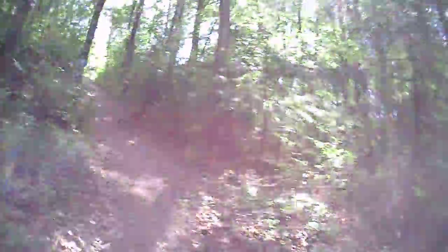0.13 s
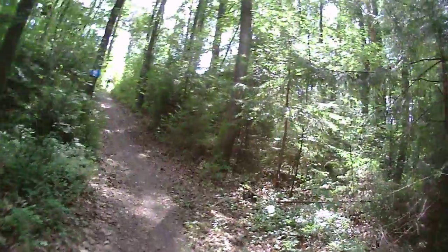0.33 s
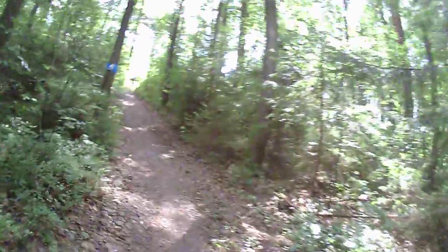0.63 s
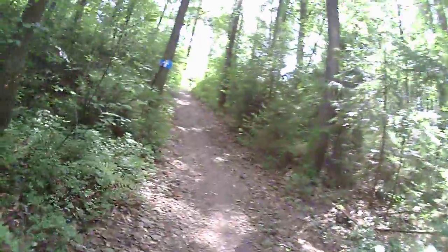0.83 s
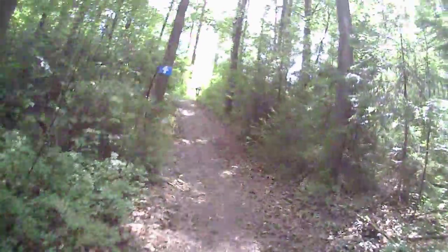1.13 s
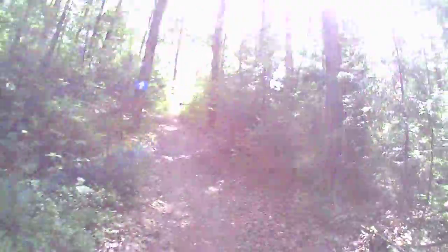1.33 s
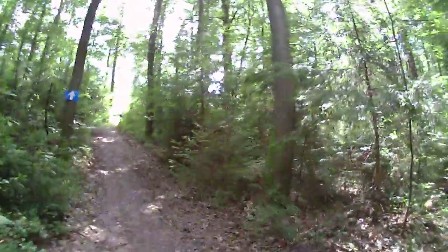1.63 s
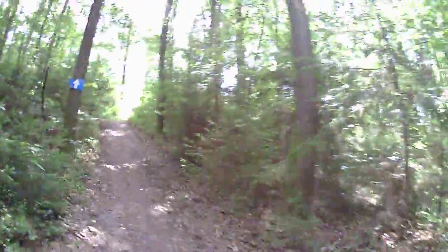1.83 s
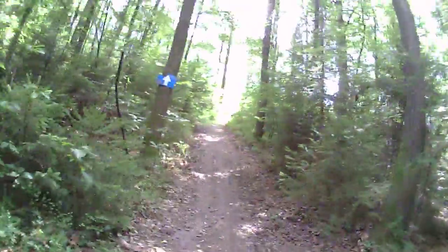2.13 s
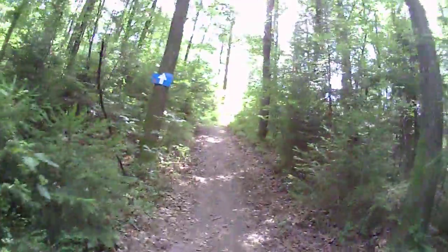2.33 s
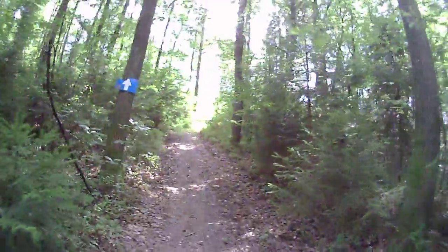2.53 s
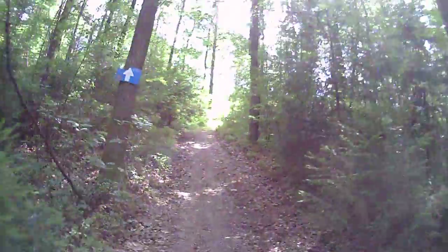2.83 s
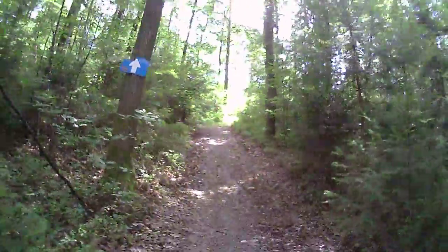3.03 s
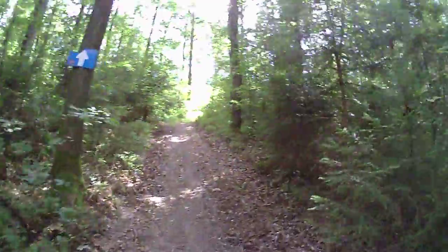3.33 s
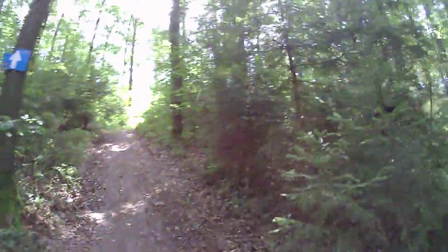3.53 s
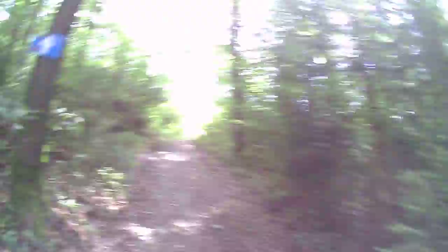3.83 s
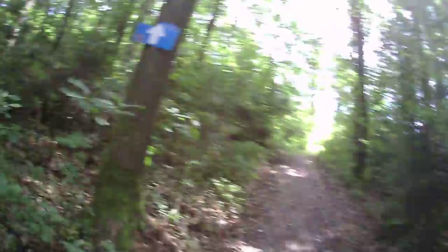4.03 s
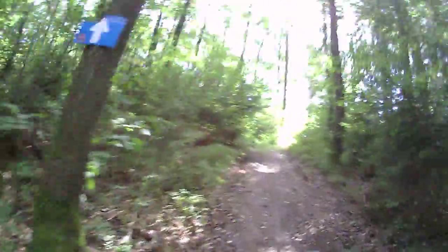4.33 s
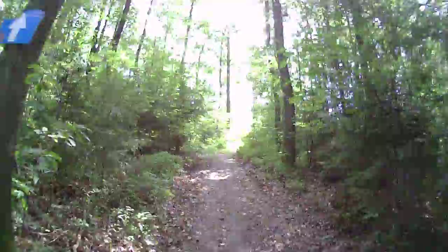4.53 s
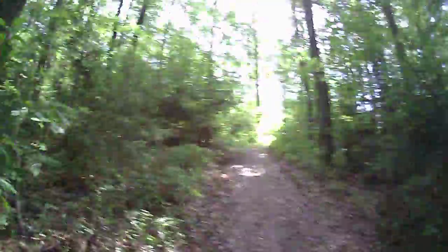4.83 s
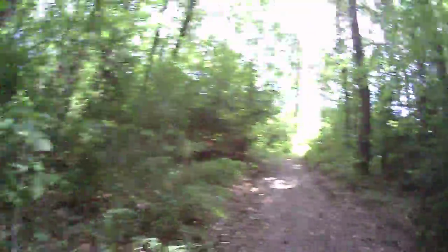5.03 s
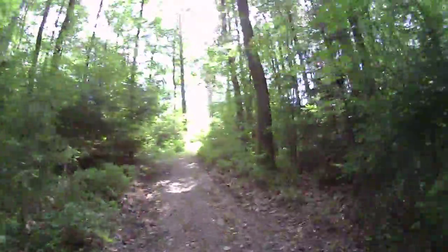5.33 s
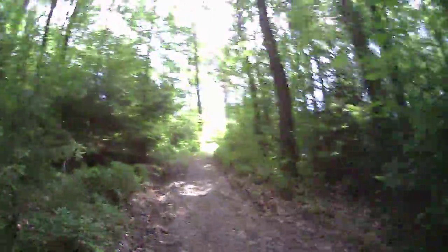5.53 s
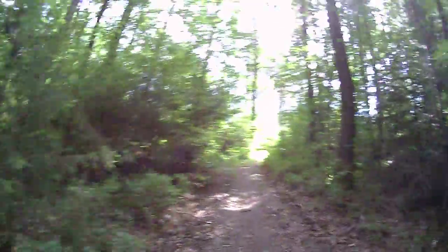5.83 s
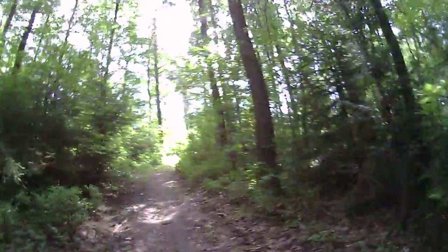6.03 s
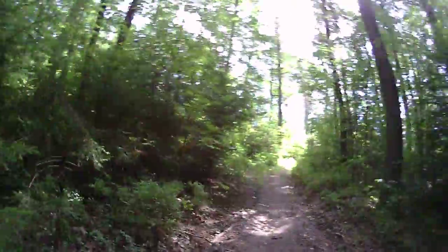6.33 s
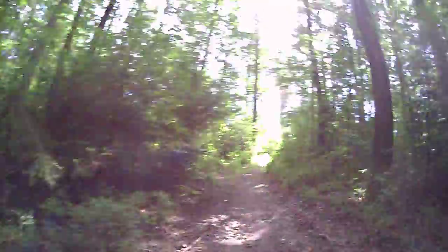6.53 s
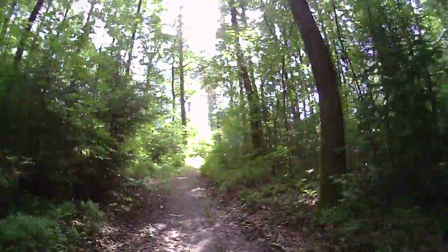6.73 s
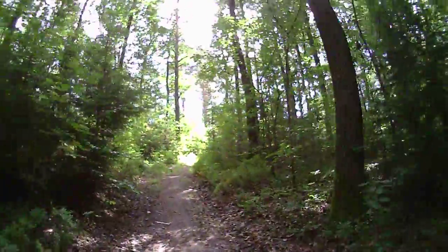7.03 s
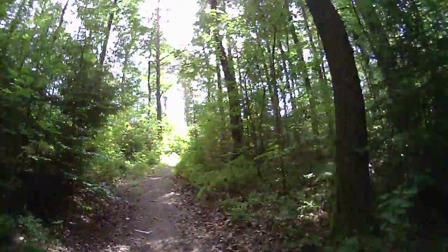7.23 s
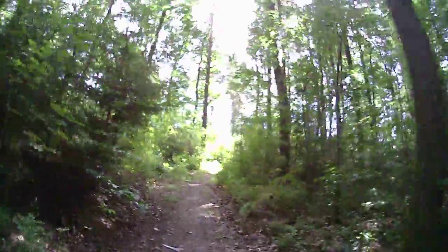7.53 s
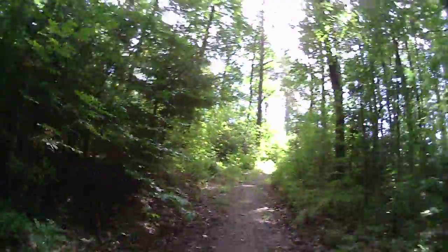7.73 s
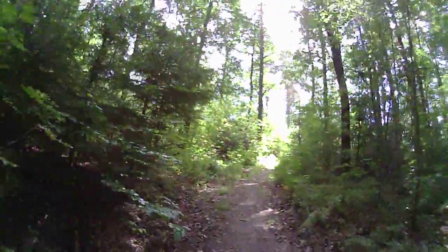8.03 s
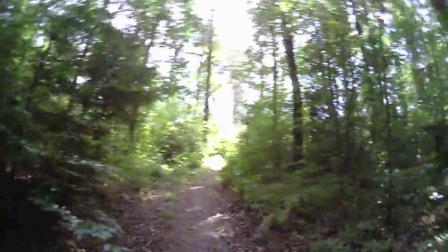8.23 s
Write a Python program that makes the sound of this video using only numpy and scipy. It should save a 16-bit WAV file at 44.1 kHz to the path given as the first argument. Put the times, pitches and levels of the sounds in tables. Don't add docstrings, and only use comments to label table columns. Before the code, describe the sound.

Bicycle tyres grind over a rough woodland path, shaking a loose camera mount. Hollow plastic clacks come in uneven flurries, a cable scrapes and slaps the frame, and the hardest jolts crackle with distortion before the ride settles into rumbling and scattered knocks. Everything is felt through the mount by a cheap, close microphone with dull treble and faint hiss.

```python
import sys
import numpy as np
from scipy import signal
from scipy.fft import rfft, irfft
from scipy.io import wavfile
from scipy.ndimage import uniform_filter1d

SR = 44100
rng = np.random.default_rng(int(sys.argv[2]) if len(sys.argv) > 2 else 0)


def natural_amplitude(level_db):
    exponent = np.asarray(level_db, float) / 20
    return 10 ** exponent


def wrap_up_sound(samples):
    columns = np.atleast_2d(samples).T
    tamed = np.clip(columns, -1, 1)
    steps = np.round(tamed * 32767).astype(np.int16)
    wavfile.write(sys.argv[1], SR, steps)


N = 369999
RING_N = 2500

# (first blow [s], last blow [s], first level [dB], last level [dB])
BUMPS = [(0.016, 0.024, -15.5, -20.5), (0.1809, 0.1966, -10.5, -17), (0.2577, 0.2898, -19.5, -15.5),
         (0.506, 0.518, -11, -33), (0.563, 0.5989, -11, -9.5), (0.7082, 0.7444, -17, -20.5),
         (0.975, 0.9887, -15, -11.5), (1.0317, 1.061, -11, -17), (1.1692, 1.18, -16.5, -13),
         (1.215, 1.2739, -14.5, -12), (1.4074, 1.421, -11, -12), (1.5093, 1.526, -9, -17),
         (1.6086, 1.624, -1.5, -1), (1.793, 1.822, -13, -13.5), (1.9298, 1.9577, -14, -8.5),
         (1.969, 2.0296, -13, -12), (2.2548, 2.267, -11.5, -15.5), (2.5854, 2.6, -12, -22),
         (3.4405, 3.496, -14, -32), (4.379, 4.391, -5.5, -2.5), (4.4575, 4.474, -10, -13.5),
         (4.53, 4.5605, -15, -14), (4.8744, 4.896, -20, -20.5), (5.231, 5.244, -18, -23),
         (5.5356, 5.551, -11.5, -8.5), (5.6, 5.615, -8, -20), (5.7435, 5.7567, -16.5, -14.5),
         (7.4617, 7.475, -19, -20), (5.2732, 5.301, -16.5, -40.5), (7.8334, 7.85, -23, -16)]
# (time [s], housing [dB], mount [dB], sharpness [dB])
CRACKS = [(.3734, -14.5, -33.5, -3.5), (2.6821, -23, -25, 8), (2.7316, -24, -27, 7), (2.7868, -8, -34, 17),
          (3.0807, -9.5, -18, -7), (3.1067, -19, -18.5, 4.5), (3.125, -10, -18.5, 3.5),
          (3.2241, -17.5, -17.5, 2.5), (3.2638, -28, -41, 8), (3.3167, -1, -31, 6.5),
          (3.525, -14.5, -11, 3.5), (3.5517, 7, -14, 3.5), (3.5952, 6, 2, 6), (3.6141, 3.5, -5, 2.5),
          (3.637, -7, -4.5, 0.5), (3.7498, 4, -15, -3), (3.7643, -30.5, -21, 11), (3.7899, -5.5, -15, -10),
          (3.9562, 4.5, -9, -4.5), (4.1271, -9, -22, 0), (4.151, -11, -22, -8), (4.326, -12, 0, 6),
          (4.3435, -17, -22, 5), (4.4349, -7, -4.5, 0), (4.6645, -3, -24, -12), (5.9795, -8, -6.5, 0),
          (1.652, -12, -10.5, 2.5), (2.1657, -25.5, -27, 4), (2.3375, -30.5, -47, 5),
          (5.0589, -30, -24, 7.5)]
# (time [s], housing [dB], mount [dB], sharpness [dB])
LANDINGS = [(.1663, -6, -1.5, 4), (.4911, -8, -8.5, -1), (.958, -19, -15, -2), (1.4965, -12, -9, 3.5),
            (1.573, -24, -19, 6), (1.5991, -7.5, -4, 10.5), (1.7768, -9.5, -2, 3.5),
            (1.845, -30.5, -18.5, 3), (2.5719, -10, -8.5, 0), (4.3612, -4.5, -3, 2.5),
            (4.5199, -10.5, -1.5, 4), (4.8624, -13.5, -12, -7), (4.995, -32, -18, 8.5),
            (5.2604, -12, -10, 1.5), (5.5228, -7, -6, 3.5), (5.5856, -14.5, -7.5, 5),
            (7.581, -25, -15.5, 6.5), (7.5934, -7.5, -6.8, 3), (7.619, -21, -16.5, 3.5),
            (7.8158, -18.5, -11, 4)]
# (time [s], housing [dB], mount [dB])
KNOCKS = [(0.4657, -18, -16.5), (0.914, -24, -27), (1.3118, -19.5, -20.5), (1.3669, -21.5, -27),
          (1.5882, -20, -8.5), (1.633, -11.5, -15), (1.6805, -13.5, -9), (2.5429, -20.5, -15.5),
          (2.8584, -18, -32), (2.9366, -23, -27), (3.8775, -19, -14), (3.9099, -21, -15),
          (3.5815, -17, -11), (4.9596, -14.5, -8.5), (4.9691, -23, -25), (5.0133, -27, -15.5),
          (5.4785, -21, -8.5), (6.008, -25, -15), (6.0708, -22, -13), (6.093, -18, -11),
          (6.1997, -17.5, -12.5), (6.2427, -16, -11.5), (6.459, -24, -20), (6.8229, -18, -17),
          (7.0258, -22.5, -22), (7.6467, -20, -10.5), (7.6859, -22.5, -14.5), (8.2722, -18.5, -22),
          (8.2987, -14.5, -13), (8.3757, -21, -42.5)]
# (time [s], level [dB])
RATTLES = [(0.479, -30.5), (0.879, -27), (2.126, -42), (2.2215, -22.5), (2.5177, -23), (2.6967, -24),
           (2.8697, -28), (3.243, -20), (4.2196, -30), (4.672, -33), (4.848, -22), (4.918, -23),
           (5.028, -24), (5.3349, -28.5), (5.3968, -32), (5.719, -31.5), (5.85, -23), (6.3583, -30),
           (6.437, -24), (6.484, -27), (6.7204, -30), (6.749, -29.5), (7.091, -23), (7.2196, -23.5),
           (7.3951, -27), (7.6064, -21), (7.9123, -21.5), (7.9357, -27), (8.044, -28.5), (8.3403, -21.5)]
# (time [s], housing [dB], mount [dB], sharpness
# [dB])
MORE_BLOWS = [(6.653, -46, -20, -6), (4.583, -27, -18, 3), (7.555, -28, -14, 9.5), (8.108, -28, -21, 2),
              (8.2, -36, -32, 9), (5.161, -28, -20, -3), (2.41, -33, -25.5, -5), (4.533, -27, -22, 10),
              (7.359, -30, -16, 3), (5.935, -31, -17.5, -6), (6.8, -32, -32, 5), (4.9, -23, -18, 0),
              (5, -30, -22, 6), (0.17, -32, -21, 0), (4.694, -27, -19.5, 0), (6.826, -31.5, -21, 11),
              (5.663, -28, -19, 2), (7.368, -34, -29, 11.5)]
# (time [s], housing [dB], mount [dB], sharpness [dB])
JOLTS = [(3.4465, -7, -16, -9), (3.479, -20, -10, 0), (3.5375, -24, -30, 5), (3.4955, -16, -11, 3),
         (5.993, -24, -20, 6), (6.022, -26, -18, -2), (6.03, -30, -30, 7), (5.863, -28, -16, -3),
         (5.878, -26, -19, 5), (1.018, -26, -22, 0), (1.2605, -15, -12, 2), (1.303, -24, -21, 0),
         (1.324, -24, -24, 2), (4.973, -26, -20, 7), (4.631, -26, -30, 2), (.276, -22, -20, 6),
         (.582, -20, -17, 4), (3.062, -24, -30, 5), (3.246, -26, -24, 4), (5.757, -24, -30, 5),
         (3.133, -15, -30, 0), (6.128, -28, -17, -3), (6.815, -27, -17, 2), (3.511, -24, -16, 0),
         (1.639, -20, -13, 3), (2.557, -28, -18, 6), (8.324, -30, -22, 2), (7.507, -28, -20, 2),
         (3.951, -16, -20, 0), (2.72, -28, -22, 4), (2.83, -26, -28, 2)]
# (frequency [Hz], level [dB], time to fade by 60 dB [s])
MOUNT_RING = [(245.4, 6.5, 0.025), (174, -12.5, 0.033), (322.4, 1, 0.028), (368.7, -11.5, 0.041)]
HOUSING_RING = [(668.5, -8, 0.048), (762, -1, 0.027), (921, 0.5, 0.015)]
SHELL_RING = [(1424.5, 7.5, 0.027), (1164, -8, 0.028), (1629, -5, 0.041)]
TICK_RING = [(2096, -5, 0.02), (2750, 3.5, 0.018), (3196, -0.5, 0.013), (3474, 1, 0.012)]
CLACK_RING = [(3040, -1, 0.011), (3150, 2, .017), (3300, 2.5, 0.03), (3600, 1, 0.012)]
CHIRR_RING = [(1445, 4.5, 0.03), (1300, -7, 0.04), (1660, -15.5, .04), (2130, -15, 0.04)]
FRAME_RING = [(765.2, -0.5, 0.17), (710, -3.5, 0.71), (1295, -4, .35), (456.9, -3, .45), (610, -3, 0.5),
              (672, -9.5, .35), (352, -9.5, 0.27), (1365, -7, .3), (523.5, -6.5, 0.24), (546, -6, 0.34),
              (425, -8.5, 0.6)]
# (time of the top [s], peak [dB], rise [s per 6 dB], fall [s per 6 dB], frame ring [dB])
SWINGS = [(1.511, -18, .012, .011, -45), (2.872, -18, .009, .011, -45), (2.95, -18, .008, .012, -40),
          (3.01, -19, .03, .025, -40), (3.096, -3.5, .011, .012, -38), (3.402, -18, .01, .01, -45),
          (3.452, -8, .008, .009, -30), (3.603, 4, .004, .013, -14), (3.76, 0, .004, .0115, -25),
          (3.967, -1, .005, .012, -24), (4.172, -15, .045, .007, -38), (4.66, -22, .025, .012, -50),
          (4.331, -9, .004, .009, -40), (4.384, -12, .006, .012, -34), (5.278, -21, .01, .008, -45),
          (.915, -22, .03, .008, -50), (1.768, -16, .01, .01, -50), (5.37, -24, .03, .02, -50),
          (6.74, -23, .015, .015, -50), (7.54, -20, .025, .01, -50), (7.92, -23, .008, .02, -50),
          (8.02, -26, .03, .02, -50), (3.303, -20, .012, .012, -50), (6.11, -20, .012, .018, -50),
          (6.793, -22, .01, .01, -50), (1.62, -11, .015, .018, -45), (2.04, -22, .02, .02, -50),
          (4.01, -23, .02, .025, -50)]
# (time [s], upper ring [dB], lower ring [dB], body [dB], ring length [factor])
PINGS = [(2.6805, -29, -45, -50, 0.58), (2.7877, -17.5, -12.5, -33, 0.71), (3.0628, -43, -48.5, -30, 1.3),
         (3.0744, -38, -41, -26, 1.1), (3.1069, -32, -39.5, -22, 0.72), (3.1251, -19, -42, -14.5, 0.63),
         (3.224, -37, -37, -34, 0.8), (3.263, -34.5, -45, -39, 0.82), (3.317, -8, -12.5, -25, 0.58),
         (3.487, -36, -48, -40, .8), (3.538, -35, -48, -40, .7), (3.551, -12.5, -15, -5, .8),
         (3.751, -40, -22, -30, .6), (3.77, -50, -38, -50, 1.3), (3.789, -48, -31, -40, .8),
         (4.1265, -35, -39, -28, 2.7), (4.151, -40, -37, -26, 1.6), (4.8273, -45, -48, -37, 0.82),
         (5.0588, -41.5, -46, -36, 0.9), (5.6477, -42.5, -54, -40, 1.7), (6.1715, -37, -56, -39, .7),
         (6.249, -35, -46, -37, .8), (7.087, -41, -56, -38, .9), (7.477, -39, -56, -44, 0.69),
         (7.412, -37.5, -56.5, -38, 0.87), (8.3763, -38.5, -57, -40, 1.1)]
PING_HZ = [2775, 2140, 1190, 3570]
PING_T60 = np.array([.035, .03, .02, .26])
# (time [s], level [dB])
CHIRRS = [(0.414, -31.5), (0.4423, -35), (0.6893, -30), (0.7906, -27.5), (0.8345, -34), (1.114, -28.5),
          (1.1506, -35), (1.3414, -29), (1.7235, -29.5), (1.8923, -26.5), (1.914, -24.5), (2.1255, -26.5),
          (2.2134, -29), (2.3276, -27), (2.372, -39), (2.385, -27.5), (2.4334, -40.5), (2.9489, -28.5),
          (2.9893, -28), (3.0135, -28), (4.0844, -25), (4.2039, -23.5), (4.2368, -32), (4.748, -28.5),
          (4.7745, -32), (5.0345, -23.5), (5.0628, -23), (5.0894, -28), (5.3004, -24), (5.6311, -25),
          (5.6501, -24), (5.7199, -22), (5.8194, -25.5), (5.914, -38.5), (6.3335, -25), (6.3795, -26.5),
          (6.4849, -24.5), (6.5211, -33), (6.6588, -32), (6.7809, -28), (6.8883, -31), (6.9861, -36),
          (7.1227, -27.5), (7.158, -26), (7.195, -25), (7.4484, -34), (7.4814, -38), (7.767, -29),
          (7.894, -27), (7.862, -29), (8.0162, -28), (8.095, -31.5), (8.2338, -30.5), (6.358, -24),
          (6.459, -22), (3.93, -22), (4.1275, -10), (1.957, -19), (6.718, -27), (6.592, -29), (1.681, -19)]
# (start [s], end [s], level [dB])
SCRAPES = [
    (2.935, 3.12, -25.5),
    (3.44, 3.55, -39),
    (4.8, 4.87, -37),
    (3.55, 3.6, -26),
    (1.88, 2.04, -29.5),
    (1.2, 1.29, -29),
    (4.32, 4.42, -28),
    (.49, .62, -34),
]
# (frequency [Hz], width [Hz], level [dB])
SCRAPE = [(454, 30, 2.5), (636, 220, 2.5), (960, 1100, 0.5), (1416, 160, -2.5), (1737, 60, -13),
          (2070, 60, -10.5), (310, 210, 4)]
MOUNT = [(248.9, 52, 1), (172, 36, -13), (414.4, 130, -10.5)]
HOUSING = [(638, 140, -4), (721, 140, -6), (883, 350, -7.5)]
SHELL = [(1435, 130, -1.5), (1280, 250, -8), (1700, 200, -13), (2135, 120, -16), (2790, 120, -15.5),
         (2550, 300, -27), (3350, 600, -23)]
# (time [s], level [dB])
RIDE = [(0.0, 1), (0.9, -1), (1.45, 0.5), (1.62, 4.5), (1.75, 0), (2.17, -1), (2.9, 0.5), (3.43, 2),
        (3.65, 5), (3.9, 5), (4.21, 1), (4.651, -0.5), (5.37, 2), (5.5, 3.5), (7.2, 1), (7.55, 4),
        (7.74, -0.5), (8.39, 1)]
# (level [dB], share of roughness [factor], after-shake re the blows [dB], after-shake 60 dB fade [s])
MOUNT_SHAKE = (-34, 1.34, -25, 0.1)
HOUSING_SHAKE = (-42.5, 2.5, -31.5, 0.16)
SHELL_SHAKE = (-45, 1, -44, 0.25)
FRAME_SHAKE = (-39, 0.72, -23.5, 0.07)
# (frequency [Hz], level [dB per Hz])
RUMBLE = [(12, -45.5), (20, -8.5), (38, -2.5), (70, -13), (119, -5.5), (167, 0.5), (200, -5.5),
          (260, -32.5), (440, -120)]


def blows():
    bounce_s, scatter_db = 0.0145, 1.5
    rows = []
    luck = rng.standard_normal((len(BUMPS), 8, 3)) * scatter_db
    for (first, last, first_db, last_db), chance in zip(BUMPS, luck):
        steps = np.linspace(0, 1, round((last - first) / bounce_s) + 1)
        for u, (a, b, c) in zip(steps, chance):
            db = first_db + u * (last_db - first_db)
            rows.append((first + u * (last - first), db - 3.5 + a, db + b, c + 0.66))
    rows += list(CRACKS) + list(LANDINGS) + list(MORE_BLOWS)
    rows += [(s, housing_db, mount_db, 0) for s, housing_db, mount_db in KNOCKS]
    rows += [(s, db, db - 0.5, -2.5) for s, db in RATTLES]
    return np.array(rows)


def knocks(hits):
    out = np.zeros(N + RING_N)
    luck = rng.standard_normal((len(hits), 4, 3, 4))
    for (s, housing_db, mount_db, sharp_db), (a, b, c, d) in zip(hits, luck):
        shell_db = housing_db - 8.5 + 0.93 * sharp_db
        tick_db = housing_db - 23 + 1.6 * sharp_db
        clack_db = min(mount_db, -6) - 29 + 0.4 * sharp_db
        blow = natural_amplitude(housing_db - 3.5) * ring(HOUSING_RING, a, 0.0012)
        blow += natural_amplitude(mount_db + 2.0) * ring(MOUNT_RING, b, 0.0008)
        blow += natural_amplitude(shell_db + 2.5) * ring(SHELL_RING, c, 0.00039)
        blow += natural_amplitude(tick_db + 4.0) * ring(TICK_RING, d, 0.0004)
        blow += natural_amplitude(clack_db) * ring(CLACK_RING, a[:, ::-1], 0.0008)
        out[round(s * SR):][:RING_N] += blow
    out = signal.sosfilt(signal.butter(4, 3700, fs=SR, output="sos"), out)
    return signal.sosfilt(signal.butter(2, 90, "high", fs=SR, output="sos"), out[:N])


def ring(modes, luck, rise_s):
    t = np.arange(RING_N)[:, None] / SR
    hz, db, t60 = np.transpose(modes)
    level_luck, length_luck, pitch_luck = luck[:, :len(hz)]
    decay_db = 3.5 * level_luck - 60 * t / (t60 * np.exp(0.12 * length_luck))
    tones = natural_amplitude(db + decay_db) * np.sin(2 * np.pi * hz * (1 + 0.03 * pitch_luck) * t)
    x = tones.sum(1) * (1 - np.exp(-t[:, 0] / rise_s)) ** 2
    return x / abs(x).max()


def swings():
    before, after = 4000, 12000
    sway_hz = 242.3
    out, t = np.zeros(N), np.arange(-before, after) / SR
    sway = np.sin(2 * np.pi * sway_hz * np.cumsum(1 + 0.022 * drift(900)) / SR)
    hum = [evened(resonate(rng.standard_normal(N), hz, 24)) for hz, db, t60 in FRAME_RING]
    for s, top_db, rise, fall, ring_db in SWINGS:
        top = round(s * SR)
        span = slice(top - before, top + after)
        bend = np.where(t < 0, (t / rise) ** 2, np.hypot(t / fall, 0.6) - 0.6)
        out[span] += natural_amplitude(top_db - 6 * bend) * sway[span]
        for tone, (hz, db, t60) in zip(hum, FRAME_RING):
            bright_db = 0.7 * (ring_db + 13.5) * (hz > 1000)
            fade_db = -60 * abs(t) / t60
            out[span] += natural_amplitude(ring_db + db + bright_db + fade_db) * (t > 0) * tone[span]
    return out


def pings():
    out, t = np.zeros(N + RING_N), np.arange(RING_N)[:, None] / SR
    held = np.maximum(t - 0.003, 0)
    waves = np.sin(2 * np.pi * np.array(PING_HZ) * t)
    for s, *levels_db, length in PINGS:
        tone_db = np.r_[levels_db, levels_db[1] - 36]
        fade_db = -60 * held / (np.array(PING_T60) * length)
        tones = natural_amplitude(tone_db + 5.5 + fade_db) * waves
        out[round(s * SR):][:RING_N] += tones.sum(1) * (1 - np.exp(-t[:, 0] / 0.0014))
    return out[:N]


def chirrs():
    out = np.zeros(N + RING_N)
    for (s, db), luck in zip(CHIRRS, rng.standard_normal((len(CHIRRS), 3, 4))):
        steady_pitch = luck * [[1], [1], [0.35]]
        out[round(s * SR):][:RING_N] += natural_amplitude(db - 1.0) * ring(CHIRR_RING, steady_pitch, 0.0027)
    return out[:N]


def scrapes(shared):
    contact = np.zeros(N)
    for start, end, db in SCRAPES:
        span = slice(round(start * SR), round(end * SR))
        contact[span] = natural_amplitude(db) * signal.windows.tukey(span.stop - span.start, 0.3)
    rub = shaken(SCRAPE, shared, jolts=0.5, lumps_db=5.0)
    return contact * signal.sosfilt(signal.butter(4, 1900, fs=SR, output="sos"), rub)


def shaken(modes, shared, jolts, lumps_db):
    wander = 0.012
    out = 0
    for k, (hz, width, db) in enumerate(modes):
        tread = natural_amplitude(lumps_db * drift(1300)) * rng.standard_normal(N)
        drive = jolts * (shared + 1.07 * grit(6.5)) + evened(tread)
        seat = drift(3000)
        tone = resonate(drive, hz, width, wander * seat[::-1])
        out = out + (-1) ** k * natural_amplitude(db + 2.4 * seat) / np.sqrt(width) * tone
    return evened(np.roll(out, -4000))


def grit(spread_db):
    stones_per_s = 300
    place, side, size = rng.random((3000, 3))[:int(stones_per_s * N / SR)].T
    out = np.zeros(N)
    out[(place * N).astype(int)] = np.sign(side - 0.5) * natural_amplitude(spread_db * np.minimum(-np.log(size), 4))
    return evened(out)


def ride(shake, s, blows_db):
    level_db, share, after_db, t60 = shake
    rough_db = np.interp(np.arange(N) / SR, *np.transpose(RIDE))
    steady = natural_amplitude(level_db + share * rough_db)
    kicks = np.zeros(N)
    kicks[np.round(s * SR).astype(int)] = natural_amplitude(np.minimum(blows_db, -6) + after_db) ** 2
    after = signal.lfilter([1], [1, -natural_amplitude(-120 / (max(t60, 0.02) * SR))], kicks)
    return np.sqrt(steady ** 2 + 10 * abs(uniform_filter1d(after, size=400)))


def rumble():
    f, db = np.transpose(RUMBLE)
    hz = np.fft.rfftfreq(N, 1 / SR)
    colour = natural_amplitude(np.interp(np.log(hz + 1), np.log(f + 1), db))
    return evened(irfft(rfft(rng.standard_normal(N)) * colour, N))


def resonate(x, hz, width, slide=0):
    r = np.exp(-np.pi * max(width, 5) / SR)
    pole = r * np.exp(2j * np.pi * hz / SR)
    turn = np.exp(2j * np.pi * hz * np.cumsum(slide) / SR)
    return 2 * (turn * signal.lfilter([(1 - r) ** 2], np.poly([pole, pole]), x)).real


def drift(samples):
    steps = rng.standard_normal(N // 50 + 2)
    width = max(int(samples / 50), 1)
    smooth = uniform_filter1d(uniform_filter1d(steps, width), width)
    return np.interp(np.arange(N) / 50, np.arange(len(steps)), evened(smooth))


def evened(x):
    return x / np.sqrt(np.mean(x ** 2) + 1e-20)


def scene():
    shared, hits = grit(5.9), blows()
    s, housing_db, mount_db, sharp_db = hits.T
    struck = knocks(hits) + knocks(JOLTS) + swings() + pings() + chirrs() + scrapes(shared)
    mount = ride(MOUNT_SHAKE, s, mount_db) * shaken(MOUNT, shared, jolts=0.8, lumps_db=2.0)
    housing = ride(HOUSING_SHAKE, s, housing_db) * shaken(HOUSING, shared, jolts=1.1, lumps_db=4.5)
    shell = ride(SHELL_SHAKE, s, housing_db) * shaken(SHELL, shared, jolts=2.8, lumps_db=7.5)
    frame = ride(FRAME_SHAKE, s, mount_db) * rumble()
    ending = np.minimum(0.3 + (N - np.arange(N)) / 300, 1)
    return ((struck + mount + housing + shell + frame) * ending)[None]


def roll_off(x):
    return signal.sosfilt(signal.butter(12, 16490, fs=SR, output="sos"), x)


def record(dry):
    overload, ceiling = 0.80, 0.712
    hiss_db, edge_hz = -57.5, 3960
    wide = np.pad(dry, [(0, 0), (400, 400)], "reflect")
    dull = signal.sosfilt(signal.butter(2, 3000, fs=SR, output="sos"), wide)
    dull = dull / (1 + (dull / overload) ** 6) ** (1 / 6)
    load = np.sqrt(abs(uniform_filter1d(dull ** 2, size=300)))
    hissy = dull + (natural_amplitude(hiss_db) + natural_amplitude(-40) * load) * rng.standard_normal(wide.shape)
    band = signal.firwin(numtaps=161, cutoff=edge_hz, window=("kaiser", 9.0), fs=SR)
    narrow = signal.oaconvolve(hissy, band[None], "same")[:, 400:-400]
    return roll_off(np.clip(narrow, -ceiling, ceiling))


dry = scene()
out = record(dry)
wrap_up_sound(out)
```